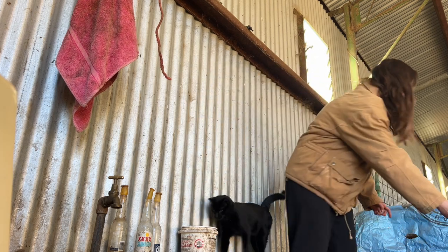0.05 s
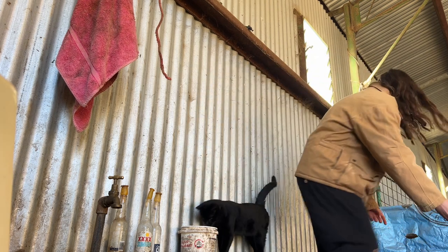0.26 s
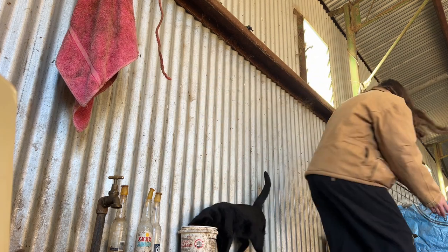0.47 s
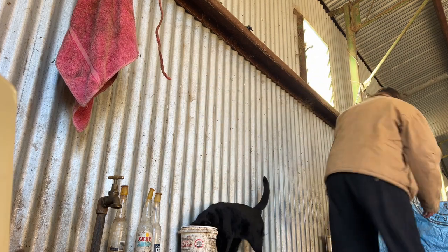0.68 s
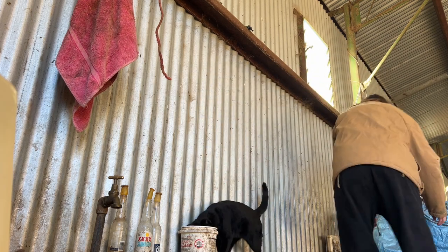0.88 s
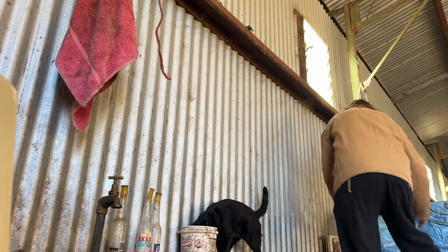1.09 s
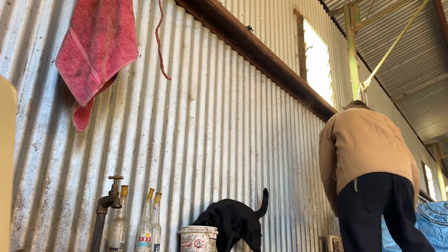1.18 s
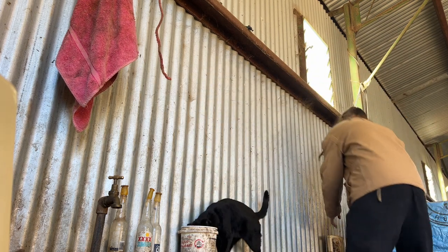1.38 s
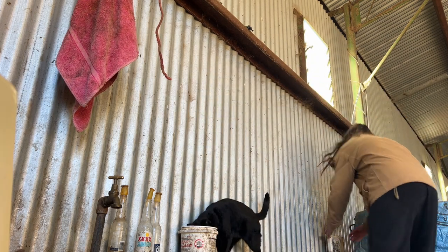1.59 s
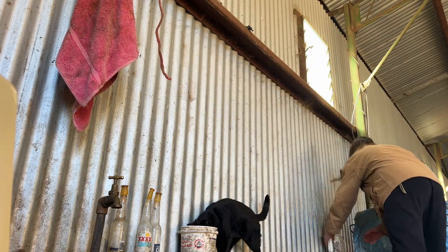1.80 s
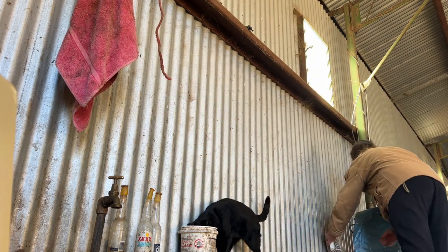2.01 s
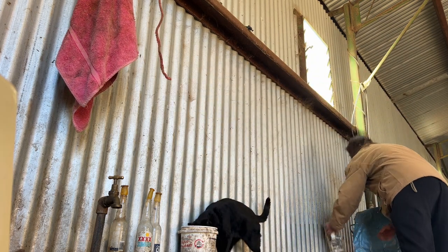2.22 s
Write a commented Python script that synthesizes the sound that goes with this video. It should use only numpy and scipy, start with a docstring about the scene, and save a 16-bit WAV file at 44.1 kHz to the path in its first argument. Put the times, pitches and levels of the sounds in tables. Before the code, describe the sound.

Close to the floor of a reverberant metal shed, a few hollow knocks lead into one long shaky lamb bleat; then scuffing and thuds, a faint bird whistle, and another lamb starting up, more quietly.

```python
"""A yard rumbles quietly throughout, under a bird's faint gliding whistles: filtered noise and swept sines.
Four knocks on something hollow follow, each a noisy crack over decaying modes, with low thuds (struck sines).
As the last knocks sound, a lamb begins one long bleat: quavering harmonics and breath through a changing throat.
Soft scuffs of grainy noise and more thuds come during and after it, and the bird whistles again.
A second lamb starts to call, its mouth closing; all but the rumble reverberates in a sheet-metal farm shed."""
import sys
import numpy as np
from scipy import signal
from scipy.fft import rfft, irfft, next_fast_len
from scipy.io import wavfile
from scipy.ndimage import uniform_filter1d, map_coordinates

SR = 44100
rng = np.random.default_rng(int(sys.argv[2]) if len(sys.argv) > 2 else 0)


def unload_wav(signal):
    """Save mono or channel-first audio to the path in sys.argv[1] as 16-bit WAV at rate SR, clipped to [-1, 1]."""
    wavfile.write(
        sys.argv[1],
        SR,
        np.round(np.clip(np.atleast_2d(signal).T, -1, 1) * 32767).astype(np.int16),
    )


N = 99225
T = np.arange(N) / SR  # time of each sample in s

# Spectrum of the air noise. Each row: frequency in Hz, relative level in dB.
AIR = [(12, -89), (24, -18), (36, -1.5), (60, -6.5), (130, -16.5), (270, -25), (660, -31.5), (1300, -42),
       (2500, -45), (3500, -47.5), (16000, -69.5)]
# Likeness of the air noise in the two channels. Each row: frequency in Hz, correlation coefficient.
AIR_ALIKE = [(60, 0.96), (300, 0.74), (1500, 0.32), (8000, 0.16)]
# Swell of the air noise. Each row: time in seconds, gain over AIR_DB in dB.
YARD = [(0, 3.5), (.8, 6.5), (1.3, 0.5), (1.7, 1.5), (1.8, 7), (2.0, 7), (2.25, 10.5)]
AIR_DB = -52.5
LUMP_DB, LUMP_HZ = 3, 14  # depth of the rumble's unevenness, its random knots a second

# Glides of the bird, one list per whistle. Each row: time in seconds, pitch in Hz, level in dB.
WHISTLES = [
    [(0, 3600, -73), (.06, 3845, -78), (.09, 3790, -83), (.11, 4050, -88)],
    [(1.85, 6600, -77), (1.9, 6040, -68), (1.96, 5600, -59.5), (2.0, 5000, -61), (2.055, 4512, -68)],
    [(1.9, 5430, -85), (1.94, 5100, -70), (1.98, 4900, -85)],
]
BIRD_WET_DB = -6

# Blows. Each row: start in seconds, level in dB, clatter length in seconds,
# centre of the excited modes in Hz, extra level of the crack in dB.
KNOCKS = [(0.205, -26, 0.02, 297, -2), (.381, -28.5, 0.0077, 555, 3.5), (0.431, -22, 0.02, 306, 0),
          (0.5, -37, 0.096, 265, 8.5)]
# Modes of the hollow body. Each row: nominal frequency in Hz, relative level in dB, T60 in seconds.
HOLLOW_MODES = [(130, -5.5, 0.28), (174.5, -0.5, 0.1), (228.4, 1, 0.13), (294.5, 1.5, 0.075),
                (358.6, -0.5, 0.093), (486, 1, 0.097), (563, -3, 0.04), (594.5, 9, 0.04), (885, 7.5, 0.073),
                (1088, 12.5, 0.018), (1660, -29, 0.054), (2370, -14, 0.092), (5060, -6, .05)]
# Spectrum of the crack. Each row: frequency in Hz, relative level in dB.
CRACK = [(40, -82), (100, -6), (300, 1.5), (600, -6), (900, -5.5), (1200, -11), (1700, -12.5), (2300, -15),
         (5000, -14.5), (8500, -20.5), (12000, -35.5), (16000, -31.5)]
SLOPE_DB = 11  # fall of the mode levels per octave from the centre
SNAP_S, BUILD_S = 0.005, 0.018  # rise time constants of the crack and of the ring
CRACK_DB, RING_DB = 16.5, 16.5
KNOCK_LAG_S, KNOCK_PAN_DB, KNOCK_WET_DB = 0.00021, -2.5, -3

# Thuds. Each row: start in seconds, level in dB.
THUDS = [(0.225, -21), (0.469, -17), (0.699, -30), (1.771, -33), (1.861, -36), (1.951, -39), (2.051, -19.5),
         (2.131, -29), (2.165, -62), (2.215, -63)]
THUD_HZ, THUD_T60_S, THUD_RISE_S = 79.7, 0.16, 0.012  # nominal pitch, decay, rise time constant
# Scuffs. Each row: centre time in seconds, level in dB, length in seconds, top of the spectrum in Hz.
SCUFFS = [(0.703, -37, 0.085, 447), (1.413, -46, 0.015, 610), (1.832, -51, 0.094, 707.8),
          (1.872, -48, 0.01, 868), (1.964, -51.5, 0.021, 1220), (2.015, -47, 0.016, 1286),
          (2.053, -42.5, 0.017, 1090), (2.074, -47.5, 0.067, 494)]

# The long bleat. Each row: time in seconds, pitch in Hz, level in dB,
# mouth position (0 opening, 1 wide, 2 slack, 3 and above spent).
BLEAT = [(.44, 277.8, -33.5, 3.4), (.49, 302.5, -32, 0.37), (.52, 315, -30, 0.71), (.6, 320.9, -31, 2),
         (.66, 321.6, -27.5, 1.54), (.71, 329, -28, 1.7), (.78, 336.6, -27.5, 0.81),
         (.92, 339.5, -27.5, 0.89), (1.05, 335.3, -27, 1.66), (1.11, 334.6, -27, 1.26),
         (1.16, 330.2, -33, 1.43), (1.19, 333.7, -30.5, 2.1), (1.22, 333, -26.5, 1.72),
         (1.33, 323.6, -31, 1.66), (1.39, 324.3, -27, 1.95), (1.43, 319.7, -29, 2.04),
         (1.5, 316.5, -33, 1.98), (1.59, 307.2, -32.5, 2.06), (1.615, 300.3, -40, 2.6),
         (1.67, 283.4, -45.5, 3), (1.76, 272.4, -58, 2.98), (1.85, 269, -60, 3.13)]
# Throat resonances in the four mouth positions. Each row: frequency in Hz, relative level in dB.
OPENING = [(300, -15), (640, -52), (960, -14), (1270, 18), (1600, -3), (2100, -39), (2850, -28), (3400, 0),
           (4100, -24), (5000, -14), (6500, -9), (9000, -13), (16000, -32)]
WIDE = [(335, -40), (670, -7.5), (1005, -12.5), (1340, -5), (1675, -19), (2010, -21), (2345, -16),
        (2680, -4), (3015, 0), (3350, -19), (4020, -5), (4350, -12), (4700, -8), (5400, -22), (6000, -14),
        (7500, -20), (9500, -27), (16000, -38)]
SLACK = [(315, -15), (640, -14.5), (960, -9), (1280, 4), (1600, -15), (1950, -24.5), (2300, -21),
         (2600, -19), (2900, -3.5), (3350, -20.5), (3900, -10), (4600, -16.5), (5400, -16.5), (6500, -24),
         (9000, -38), (16000, -59)]
SPENT = [(300, 1.5), (900, 4.5), (1250, 15), (1500, 2), (2000, -11), (2600, -11), (3000, -6.5), (3500, -29),
         (4500, -28), (6500, -22), (9000, -77), (16000, -86)]
# The second lamb's call. Each row: time in seconds, pitch in Hz, level in dB, mouth (0 thin to 1 humming).
ANSWER = [(1.99, 331, -72, 0.23), (2.055, 351.4, -47.5, 0.15), (2.1, 352.4, -48.5, 0.14),
          (2.15, 366.5, -45, 0.44), (2.175, 376.8, -43, 0.45), (2.21, 375.4, -41.5, 0.69),
          (2.25, 382.7, -41, 0.66)]
# Throat resonances of the second lamb. Each row: frequency in Hz, relative level in dB.
THIN = [(350, 1.5), (700, 4), (1500, 2), (2500, -5), (3900, 9), (4700, -13), (6200, -2), (8400, -22),
        (12000, -26), (16000, -55)]
HUM = [(378, 3.5), (760, -20), (1900, -16), (2300, -24), (3000, -7), (3400, -11), (3900, -38), (6000, -15),
       (7600, -15), (12000, -29), (16000, -76)]
# Hoarseness. Each row: time in seconds, share of the power that is breath (0 to 1).
HOARSE = [(0, .4), (.62, .3), (.78, .12), (1.2, .08), (1.3, .04), (1.58, .05), (1.62, .85), (1.9, .85),
          (2.06, .3), (2.12, .08), (2.25, .05)]
# Emphasis of the second harmonic. Each row: time in seconds, extra level in dB.
SECOND = [(.66, -6), (.76, -2), (1.0, -0.5), (1.14, 4.5), (1.19, -16), (1.24, -4), (1.6, 2), (1.7, 1)]
# Shading of the lambs between channels. Each row: frequency in Hz, left over right in dB.
LAMB_BALANCE = [(300, -3.5), (1300, -4.5), (2800, -1.5), (4500, 7), (9000, 4.5)]
QUAVER_HZ, QUAVER_DB, QUAVER_PITCH = 17, 2.2, 0.002  # mean rate, level swing, fractional pitch swing
JITTER = 0.0014  # fractional size of the random pitch wander
BLUR_HZ = 7000  # harmonics are weakened to a half here
BREATH_HZ, LOW_BREATH = 2600, 0.2  # corner of the breath's rise, gain well below it
FLICKER_HZ = 45  # random knots a second in each harmonic's level
STEADY_HZ, FLICKER_MOST = 1300, 1.7  # harmonics below flicker less, those above more, up to this factor
FLICKER_DB, ANSWER_FLICKER_DB = 2.6, 2.5  # flicker depth at STEADY_HZ
LAMB_LAG_S, LAMB_WET_DB, ANSWER_WET_DB = 0.0004006, -3, -9

# Reverberation of the shed. Each row: frequency in Hz, T60 in seconds.
SHED = [(80, 0.54), (300, 0.55), (1200, 0.45), (4000, 0.48), (9000, 0.53), (15000, 0.1)]
# Likeness of the reverberation in the two channels. Each row: frequency in Hz, correlation coefficient.
SHED_ALIKE = [(60, 0.75), (250, 0.88), (700, 0.36), (2000, 0.45)]
TOP_HZ = 16700


def amp(db):
    """A level in decibels is twenty times the logarithm of this amplitude ratio."""
    return 10 ** (np.asarray(db) / 20)


def unit(x):
    """Division by the root mean square gives unit power."""
    return x / np.sqrt(np.mean(x ** 2) + 1e-20)


def along(points, hz):
    """Linear interpolation of a spectrum on a logarithmic frequency axis."""
    f, v = np.transpose(points)
    return np.interp(np.log(hz + 1), np.log(f + 1), v)


def curves(rows):
    """Linear interpolation in time of each column after the first, and a mask of the span covered."""
    s, *cols = np.transpose(rows)
    return [np.interp(T, s, c) for c in cols] + [(T >= s[0]) & (T <= s[-1])]


def wobble(rate):
    """Spline interpolation of random knots, rate of them a second, gives a smooth random modulation."""
    knots = rng.standard_normal(int(N * rate / SR) + 4)
    return map_coordinates(knots, [T * rate])


def filtered(x, response):
    """Linear filtering multiplies the spectrum by a frequency response."""
    m = next_fast_len(N + SR // 2)
    return irfft(rfft(x, m) * response(np.fft.rfftfreq(m, 1 / SR)), m)[..., :N]


def blend(pair, alike):
    """Sum and difference of two independent signals give a chosen correlation at each frequency."""
    def mix(hz):
        turn = np.arccos(np.clip(along(alike, hz), -1, 1)) / 2
        return np.array([np.cos(turn), np.sin(turn)])

    mid, side = filtered(pair, mix)
    return np.array([mid + side, mid - side])


def placed(x, lag_s, pan_db, wet_db):
    """Interaural lag (right first) and level (left over right) place a source; decaying noise reverberates."""
    hz, t, z = signal.stft(rng.standard_normal((2, SR)), SR, nperseg=256)
    decay = amp(-60 * t / along(SHED, hz)[:, None])
    tail = signal.istft(z * decay, SR, nperseg=256)[1]
    tail = tail / np.linalg.norm(tail[0])
    late = np.pad(x, (200, 0))  # delay in samples before the reverberation
    wet = signal.fftconvolve(late[None], tail, axes=1)[:, :N]
    direct = filtered(x, lambda f: np.exp(-1j * np.pi * f * lag_s * np.array([[1], [-1]])))
    return (direct + amp(wet_db) * blend(wet, SHED_ALIKE)) * amp([[pan_db / 2], [-pan_db / 2]])


def air():
    """Coloured noise: a slow random modulation makes the rumble lumpy below a steadier hiss."""
    noise = filtered(rng.standard_normal((2, N)), lambda f: amp(along(AIR, f)))
    noise = unit(blend(noise, AIR_ALIKE))
    rumble = filtered(noise, lambda f: 1 / (1 + (f / 600) ** 2))
    lumps = amp(LUMP_DB * wobble(LUMP_HZ))
    return amp(AIR_DB + curves(YARD)[0]) * (noise + (lumps - 1) * rumble)


def bird():
    """Frequency modulation of a sine: phase is the integral of the gliding pitch of each faint whistle."""
    out = np.zeros(N)
    for rows in WHISTLES:
        hz, db, on = curves(rows)
        phase = 2 * np.pi * np.cumsum(hz) / SR
        out += on * amp(db + 1.6 * wobble(39.3)) * np.sin(phase)
    return placed(out, 0, 0, BIRD_WET_DB)


def crack(t, length):
    """Impact noise: a short clatter of contacts, brought to equal energy and then coloured."""
    envelope = (1 - np.exp(-t / SNAP_S)) * np.exp(-np.minimum(t / length, 20) ** 2)
    clatter = envelope * rng.standard_normal(N) * amp(3 * wobble(250))
    clatter /= np.sqrt(np.sum(clatter ** 2) / (0.02 * SR))
    return filtered(clatter, lambda f: amp(along(CRACK, f)))


def hollow_ring(t, centre_hz):
    """Modal synthesis: a blow excites most the modes near its centre, and each decays exponentially."""
    ring = np.zeros(N)
    for hz, level, t60 in HOLLOW_MODES:
        mode_db = level - SLOPE_DB * abs(np.log2(hz / centre_hz)) + rng.normal(0, 4)
        mode_hz = hz * rng.normal(1, 0.013)
        ring += amp(mode_db - 60 * t / t60) * np.sin(2 * np.pi * (mode_hz * t + rng.random()))
    return (1 - np.exp(-t / BUILD_S)) * ring


def knocks():
    """Superposition of contact noise and resonance: each knock cracks while the hollow body rings."""
    out = np.zeros(N)
    for s, db, length, centre_hz, crack_db in KNOCKS:
        t = (T - s).clip(0)
        ring = amp(RING_DB) * hollow_ring(t, centre_hz)
        out += amp(db) * (ring + amp(CRACK_DB + crack_db) * crack(t, length))
    return placed(out, KNOCK_LAG_S, KNOCK_PAN_DB, KNOCK_WET_DB)


def thuds():
    """Damped oscillation: each low thud through the floor is a sine that rises softly and decays."""
    out = np.zeros(N)
    for s, db in THUDS:
        t = (T - s).clip(0)
        hz = THUD_HZ * (1 + rng.normal(0, .04))
        out += amp(db - 60 * t / THUD_T60_S) * (1 - np.exp(-t / THUD_RISE_S)) * np.sin(2 * np.pi * hz * t)
    return out


def scuffs():
    """Friction noise: grainy low-passed noise under a bell-shaped envelope for each scuff on the floor."""
    out = np.zeros(N)
    for s, db, length, top_hz in SCUFFS:
        grains = rng.standard_normal(N) * amp(2.9 * wobble(130))
        grit = unit(filtered(grains, lambda f: (f > 150) / (1 + (f / top_hz) ** 3)))
        out += amp(db) * np.exp(-((T - s) / length) ** 2 * 4) * grit
    return out


def footwork():
    """Superposition: thuds and scuffs share one place and one reverberation."""
    return placed(thuds() + scuffs(), 0, -3.0, -5.5)


def harmonics(hz, phase, shares, throats, flicker_db):
    """Source and filter: harmonics of the pitch take the throat's levels, and the highest are weakened."""
    second_db = curves(SECOND)[0]
    tone, power = np.zeros(N), np.zeros(N)
    for k in range(1, 40):
        db = sum(share * along(shape, k * hz) for share, shape in zip(shares, throats))
        flicker = flicker_db * np.minimum(k * hz / STEADY_HZ, FLICKER_MOST) * wobble(FLICKER_HZ)
        size = amp(db + (k == 2) * second_db + flicker)
        blur = 1 / (1 + (k * hz / BLUR_HZ) ** 2)
        tone += size * blur * np.sin(k * phase + k * k * 0.0484)
        power += size ** 2 / 2
    return tone / np.sqrt(uniform_filter1d(power, 4000))


def throat_breath(phase, shares, throats):
    """Modulated turbulence: noise gated once a cycle of the voice is coloured by the same throat."""
    puffs = rng.standard_normal(N) * (1 + 1.6 * np.cos(phase))
    breath = np.zeros(N)
    for share, shape in zip(shares, throats):
        def response(f):
            rise = LOW_BREATH + 1 / (1 + (BREATH_HZ / (f + 1)) ** 4)
            return amp(along(shape, f)) * rise * (f > 700)

        breath += share * unit(filtered(puffs, response))
    return breath


def voice(rows, throats, flicker_db):
    """Vibrato and cross-fading resonances: a quavering pitch and breath pass a changing mouth."""
    hz, db, mouth, on = curves(rows)
    hoarse = curves(HOARSE)[0]
    position = np.clip(mouth, 0, len(throats) - 1)
    shares = [np.clip(1 - abs(position - i), 0, 1) for i in range(len(throats))]
    quaver = np.sin(2 * np.pi * np.cumsum(QUAVER_HZ * (1 + 0.2903 * wobble(5.43))) / SR)
    hz = hz * (1 + QUAVER_PITCH * quaver + JITTER * wobble(90.12))
    phase = 2 * np.pi * np.cumsum(hz) / SR
    tone = harmonics(hz, phase, shares, throats, flicker_db)
    breath = throat_breath(phase, shares, throats)
    sound = np.sqrt(1 - hoarse) * tone + np.sqrt(hoarse) * breath
    return on * amp(db + QUAVER_DB * quaver) * sound


def lambs():
    """Interchannel shading: both calls come from one pen, and their left-right balance varies with frequency."""
    bleat = voice(BLEAT, [OPENING, WIDE, SLACK, SPENT], FLICKER_DB)
    answer = voice(ANSWER, [THIN, HUM], ANSWER_FLICKER_DB)
    both = placed(bleat, LAMB_LAG_S, 0, LAMB_WET_DB) + placed(answer, LAMB_LAG_S, -0.69, ANSWER_WET_DB)
    return filtered(both, lambda hz: amp(along(LAMB_BALANCE, hz) * np.array([[.5], [-.5]])))


def scene():
    """Superposition: the sound pressures of all sources add."""
    return air() + bird() + knocks() + footwork() + lambs()


def record(dry):
    """Band limitation: nothing is kept at or above TOP_HZ."""
    return filtered(dry, lambda hz: hz < TOP_HZ)


dry = scene()
out = record(dry)
unload_wav(out)
```